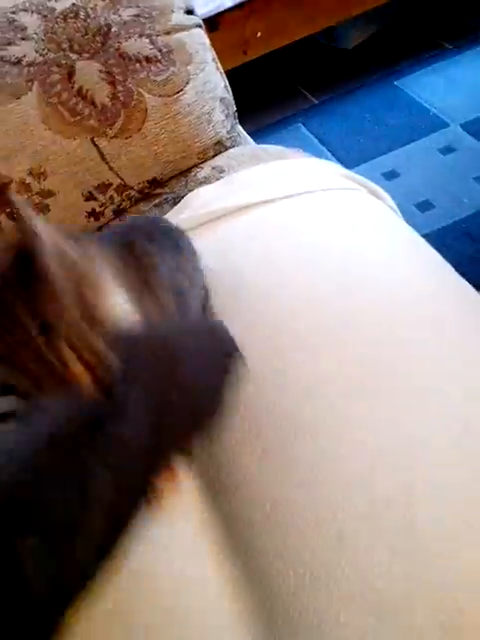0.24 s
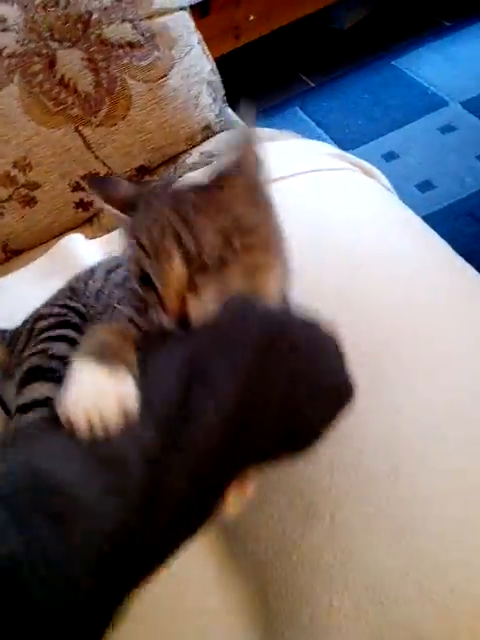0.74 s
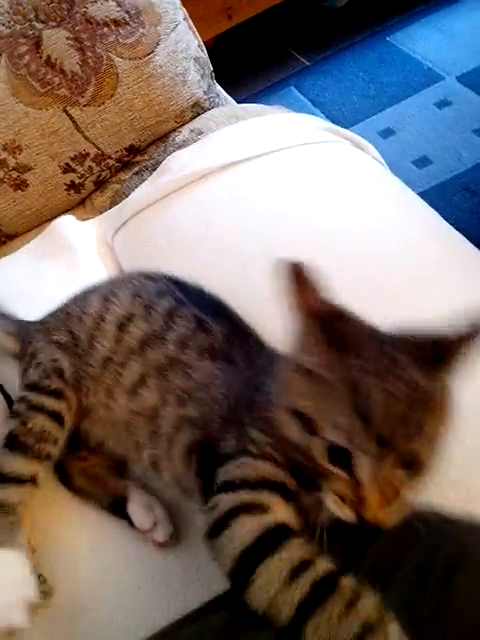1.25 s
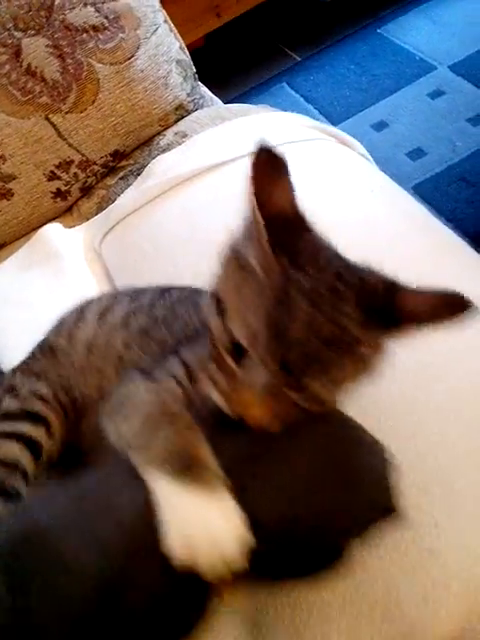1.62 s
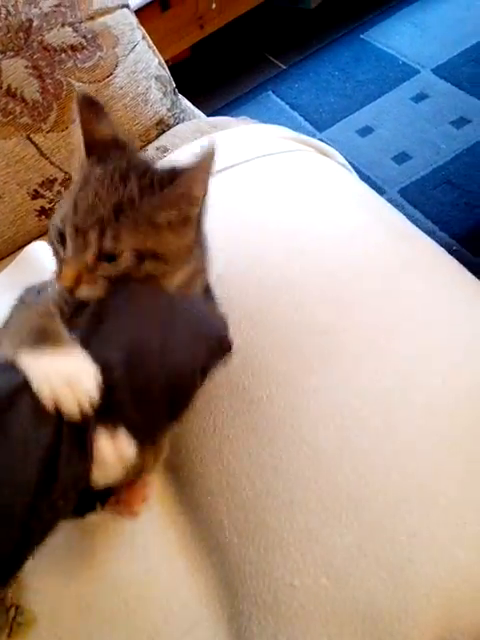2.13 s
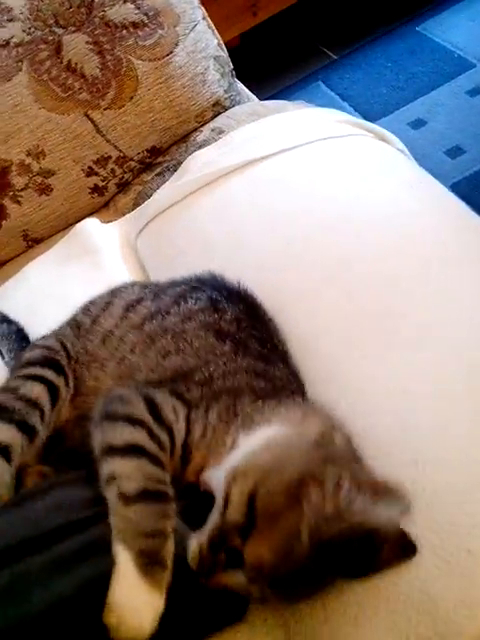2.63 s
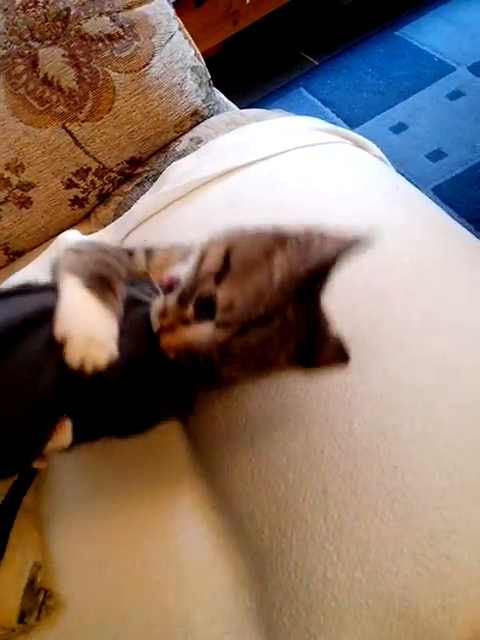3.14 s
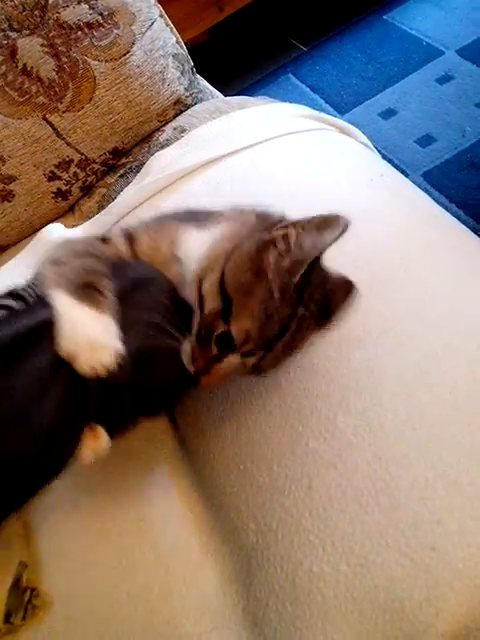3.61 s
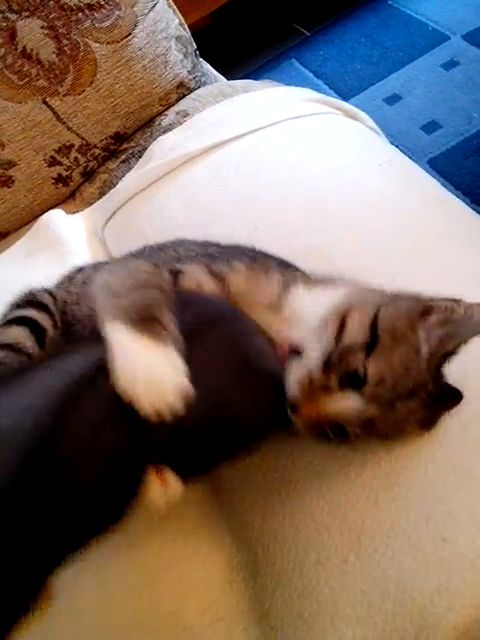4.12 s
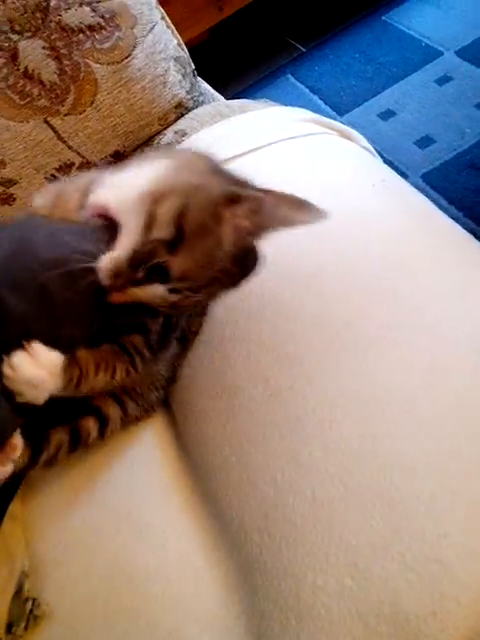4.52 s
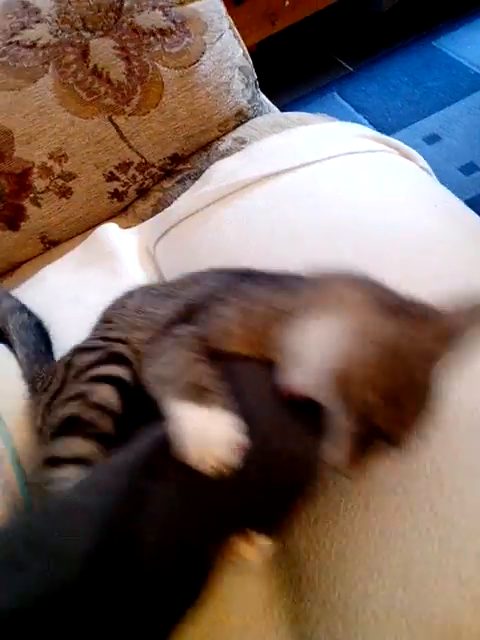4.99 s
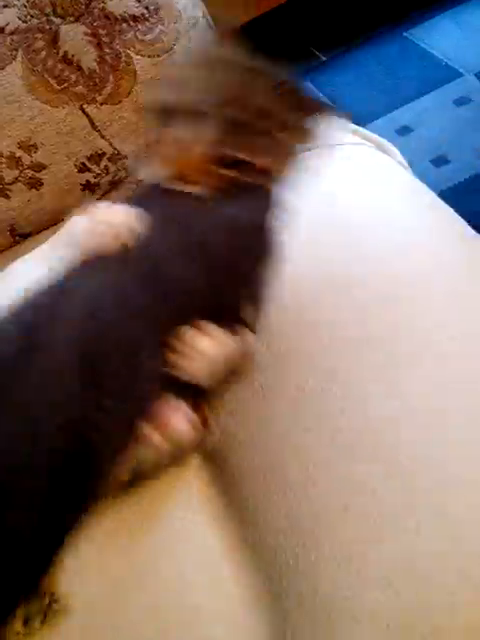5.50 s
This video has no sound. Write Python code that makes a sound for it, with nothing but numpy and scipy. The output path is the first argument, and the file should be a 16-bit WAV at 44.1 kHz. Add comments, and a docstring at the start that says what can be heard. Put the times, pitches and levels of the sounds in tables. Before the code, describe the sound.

A small, quiet furnished room, heard through one close, modest microphone with thin bass and no extreme treble. Soft air noise, hiss and very faint cloth rustling run throughout. At 0.15 s a bright cloth snap comes with a padded paw bump and tiny scrape. From 0.5 to 1.5 s short scuffs, fabric rubs and dull thumps cluster irregularly, with lighter ticks near 0.8 and 1.0 s and a firmer bump at 1.5 s. At 2.0 s a strong snap with a knock rings out, another at 2.2 s, then a duller thump and scrape at 2.6 s. Around 3.1 to 3.2 s quick ticks accompany a heavy soft thud; crisp clicks follow until 3.5 s. After a lull, a flurry of small clicks runs from 4.4 to 4.7 s. Faint rubbing leads to a last sharp snap at 5.7 s. Each snap gets a brief hard-surface echo and short room tail.

```python
"""A kitten wrestles with a sleeved arm on a sofa in a small, quiet room; air, hiss and faint cloth rustle run throughout.
It opens with a snap, a paw bump and a scrape; scuffs and soft bumps follow until about 1.5 s.
From 2 to 3.5 s claws and teeth snap free again and again; a denser flurry comes at 4.4 to 4.7 s.
Faint rubbing leads to a last snap at 5.72 s. Snaps and thuds are damped pulses, rubs are clumpy shaped noise;
two hard surfaces echo each snap and the room rings briefly."""
import sys
import numpy as np
from scipy import signal
from scipy.fft import rfft, irfft, next_fast_len
from scipy.io import wavfile
from scipy.ndimage import map_coordinates

SR = 44100
rng = np.random.default_rng(int(sys.argv[2]) if len(sys.argv) > 2 else 0)


def put_to_file(sound):
    """Save the sound as 16-bit audio at rate SR, in the file named by the first command-line argument."""
    columns = np.atleast_2d(sound).T  # one column per channel
    safe = np.clip(columns, -1, 1)
    whole_steps = np.round(safe * 32767)
    wavfile.write(sys.argv[1], SR, whole_steps.astype(np.int16))


N = 253575  # samples in the scene
SIZE, LEAD = 2048, 256  # samples in one pulse, and of those before its onset


def amp(db):
    """Decibels to gain."""
    return 10 ** (np.asarray(db) / 20)


def unit(x):
    """x at rms 1."""
    return x / np.sqrt(np.mean(x ** 2) + 1e-20)


def along(points, hz):
    """Read (frequency, value) points on a log frequency axis."""
    f, v = np.transpose(points)
    return np.interp(np.log(hz + 1e-6), np.log(f), v)


def add(track, s, x):
    """Mix x into the track from time s."""
    i = max(round(s * SR), 0)
    track[i:i + len(x)] += x[:max(len(track) - i, 0)]


def wobble(rate, n):
    """A smooth random curve of n samples, rate knots a second."""
    knots = rng.standard_normal(int(n * rate / SR) + 4)
    return map_coordinates(knots, [np.arange(n) * rate / SR])


def filtered(x, gain_at):
    """x times a gain that depends on frequency."""
    m = next_fast_len(x.shape[-1] + 8192)
    spectrum = rfft(x, m) * gain_at(np.fft.rfftfreq(m, 1 / SR))
    return irfft(spectrum, m)[..., :x.shape[-1]]


def coloured(x, shape, pitch_hz=1):
    """x through a spectrum shape, at rms 1."""
    return unit(filtered(x, lambda hz: amp(along(shape, hz / pitch_hz))))


def fibres(n, rate, clump_db):
    """Threads slipping: noise that comes in small clumps."""
    return rng.standard_normal(n) * amp(clump_db * wobble(rate, n))


def pulse(shape, pitch_hz, ripple_db, abrupt, narrowness=1):
    """One push through a damped body, rms 1 over 10 ms; abrupt 1 starts at once, 0 swells as it fades."""
    ratio = np.fft.rfftfreq(SIZE, 1 / SR) / pitch_hz
    # random ripple makes every body slightly different
    ripple = map_coordinates(rng.standard_normal(size=64), [8 * np.log1p(ratio)], mode="nearest")
    colour_db = narrowness * along(shape, ratio) + ripple_db * ripple
    # moving the cepstrum to positive times moves the energy after the onset
    cepstrum = irfft(np.log(amp(colour_db)))
    cepstrum[1:SIZE // 2] *= 1 + min(abrupt, 1)
    cepstrum[SIZE // 2 + 1:] *= 1 - min(abrupt, 1)
    ring = np.roll(irfft(np.exp(rfft(cepstrum))), LEAD)
    return ring * np.sqrt(SR / 100) / np.linalg.norm(ring)


# how long the room rings: (frequency [Hz], time to fall 60 dB [s])
ROOM_DECAY = [(150, 0.31), (500, 0.27), (2000, 0.23), (4500, 0.32), (8000, 0.14)]


def room_tail():
    """Scattered reflections: a strong start, a dip, a rebuild by 12 ms, each band dying at its own speed; energy 1."""
    hz, t, z = signal.stft(rng.standard_normal(SR // 3), SR, nperseg=256)
    decay = amp(-60 * t / along(ROOM_DECAY, hz)[:, None])
    tail = signal.istft(z * decay, SR, nperseg=256)[1]
    t = np.arange(len(tail)) / SR
    build = np.interp(t, [0, .008, .012], [.33, .5, 1])
    early = 1 + 4.2 * np.exp(-t / 0.0045)
    tail *= build * early
    return tail / np.linalg.norm(tail)


def echo(delay_s, spread_s):
    """A near hard surface answers with a slightly smeared copy; energy 1."""
    t = np.arange(SIZE // 8) / SR
    smear = .2 * rng.standard_normal(len(t)) * np.exp(-t / spread_s)
    smear[0] = 1
    return np.pad(smear / np.linalg.norm(smear), (round(delay_s * SR), 0))


# colour of the room's air and the microphone hiss: (frequency [Hz], level [dB])
AIR_COLOUR = [(20, -37), (45, -12), (75, -6.5), (105, -5), (150, 0.5), (250, -3), (400, -5), (800, -10.5),
              (1700, -13.5), (3000, -17), (5000, -15.5), (6800, -15.5), (8000, -28.5), (9000, -48)]
# colour of shifting padding: (multiple of its pitch [ratio], level [dB])
BODY_SHAPE = [(.1, -25), (.35, -4), (.65, -9), (1, 1.5), (1.4, -8), (2.3, -11.5), (5, -18), (14, -58.5)]
# colour of taut cloth, for rustles and clacks: (multiple of its pitch [ratio], level [dB])
CLACK_SHAPE = [(.25, -24.5), (.5, -8.5), (0.748, -0.5), (1.002, 5), (1.222, 3), (1.45, -25), (2.199, -27),
               (6, -57)]
AIR_DB = -52.5
FIDGET_DB, FIDGET_RATE, FIDGET_SWING_DB = -74.5, 9.7, 2.5  # moving sleeve: level, knots a second, depth


def background():
    """Room air and microphone hiss as shaped noise, with faint constant shifting and rustling of cloth."""
    air = amp(AIR_DB) * coloured(rng.standard_normal(N), AIR_COLOUR)
    shifting = amp(-65.0) * coloured(fibres(N, rate=36, clump_db=6.5), BODY_SHAPE, 295)
    fidget = fibres(N, rate=FIDGET_RATE, clump_db=FIDGET_SWING_DB)
    rustle = amp(FIDGET_DB) * coloured(fidget, CLACK_SHAPE, 1400)
    return air + shifting + rustle


STROKE_SKEW, STROKE_ROUND = 0.58, 0.61  # a rub swells faster than it fades (skew under 1)


def stroke(length_s):
    """The swell and fade of one rub, rms 1."""
    n = max(round(length_s * SR), SIZE // 8)
    arch = np.sin(np.pi * (np.arange(n) / n) ** STROKE_SKEW)
    return unit(np.abs(arch) ** STROKE_ROUND)


# hiss of the weave: (frequency [Hz], level [dB])
WEAVE_HISS = [(1500, -25), (2400, -10), (3300, -3), (4500, 0), (5500, -4), (6800, -8), (8000, -25),
              (9000, -45)]
RUSTLE_DB, HISS_DB = -5.5, -1.5  # the sleeve and the weave, against the surface level


def rub(length_s, body_db, body_hz, surface_db):
    """Rubbing shakes the padding, rustles the sleeve and hisses in the weave."""
    swell = stroke(length_s)
    n = len(swell)
    body = amp(body_db) * coloured(fibres(n, rate=147.8, clump_db=5), BODY_SHAPE, body_hz)
    rustle = amp(RUSTLE_DB) * coloured(fibres(n, rate=380, clump_db=2.5), CLACK_SHAPE, 1720)
    hiss = amp(HISS_DB) * coloured(fibres(n, rate=440, clump_db=3.5), WEAVE_HISS)
    return swell * (body + amp(surface_db) * (rustle + hiss))


# cloth rubbing: (start [s], length [s], body level [dB], body pitch [Hz], surface level [dB])
SCUFFS = [(0.523, 0.087, -50, 150, -64), (.595, 0.1, -42.5, 187, -57.5), (.715, 0.069, -46.5, 266, -58.5),
          (.775, 0.06, -44, 316, -53.5), (.985, 0.092, -47, 344, -56.5), (1.072, 0.056, -47, 170, -56),
          (1.307, 0.093, -54.5, 368, -62), (1.406, 0.12, -47, 245, -59), (1.54, .06, -52.5, 320, -62),
          (2.035, 0.065, -48, 600, -66), (2.63, 0.17, -51, 320, -57.5), (3.1, 0.16, -48.5, 220, -68),
          (4.38, .07, -49.5, 396, -56), (4.696, .07, -54, 200, -58), (5.439, 0.18, -57, 310, -69)]


def scuffs():
    """Fur and sleeve rub over the sofa as the two shift their grip."""
    out = np.zeros(N)
    for start, length_s, body_db, body_hz, surface_db in SCUFFS:
        add(out, start, rub(length_s, body_db, body_hz, surface_db))
    return out


# a claw or paw dragged over the weave: (start [s], length [s], level [dB], pitch [Hz])
SCRAPES = [(0.159, 0.043, -53, 2190), (0.249, .05, -64, 2870), (0.645, .055, -49, 534),
           (0.736, 0.11, -53, 4820), (0.986, .06, -46.5, 4850), (1.087, .055, -50, 1300),
           (1.438, .11, -53, 3660), (2.213, .06, -50.5, 1480), (2.304, .05, -59, 1730),
           (2.63, 0.093, -43, 482), (4.7, .07, -52.5, 4600), (5.115, .08, -65, 1640)]
# narrow colour of a scrape: (multiple of its pitch [ratio], level [dB])
SCRAPE_SHAPE = [(.55, -48), (.75, -12), (.9, -5), (1.08, -0.5), (1.25, -31.5), (1.6, -29.5)]


def scrapes():
    """Crossing threads at a steady speed sings in a narrow band."""
    out = np.zeros(N)
    for start, length_s, db, hz in SCRAPES:
        swell = stroke(length_s)
        threads = fibres(len(swell), rate=300, clump_db=4)
        add(out, start, amp(db) * swell * coloured(threads, SCRAPE_SHAPE, hz))
    return out


# soft blows on the cushion: (time [s], level [dB], pitch [Hz])
BUMPS = [(0.154, -44, 197), (.213, -40, 246), (0.2207, -30.5, 198), (0.6265, -40, 260), (0.6339, -41, 159),
         (0.7536, -37.5, 316), (1.0766, -39, 195), (1.4467, -43, 197), (1.4953, -29, 241),
         (2.094, -39, 134), (2.6085, -30.5, 207), (3.1041, -35.5, 196), (3.1649, -25.5, 214),
         (4.6954, -40.5, 148)]
# colour of a blow: (multiple of its pitch [ratio], level [dB])
BUMP_SHAPE = [(.1, -18), (.35, -18.5), (.65, -3.5), (1, -2.5), (1.6, -9), (2.6, -26.5), (6, -49),
              (20, -81.5)]


def bumps():
    """Paws and body land on the cushion: a damped low pulse, with a little room behind it."""
    out = np.zeros(N)
    for s, db, hz in BUMPS:
        start = s - LEAD / SR
        thud = amp(db) * pulse(BUMP_SHAPE, hz, ripple_db=1.5, abrupt=0.7)
        add(out, start, thud)
        add(out, start, amp(-11) * signal.fftconvolve(thud, room_tail()))
    return out


# cloth snapping free: (time [s], tick level [dB], tick pitch [Hz], clack level [dB], clack pitch [Hz],
# knock level [dB], room against tick [dB])
SNAPS = [(0.1514, -32, 4680, -33.5, 670, -29.5, -4), (0.2222, -53, 3070, -52.5, 1010, -50.5, 2.5),
         (0.7877, -37.5, 4330, -71, 960, -46, -4.5), (0.9818, -43, 4240, -48.5, 1220, -54, -5),
         (1.914, -56, 3420, -63, 1700, -54, -2), (2.0281, -30, 4530, -27.5, 1604, -22.5, -10.5),
         (2.2081, -33, 4260, -34.5, 1460, -32, -11), (2.6015, -46.5, 4160, -37, 1130, -27, 12),
         (3.099, -37.5, 4960, -36.5, 555, -37, -5.5), (3.1597, -39.5, 4950, -35.5, 910, -40.5, -8),
         (3.2204, -26.5, 4240, -56, 970, -50, -15.5), (3.3634, -40, 4000, -53.5, 1780, -60, -7.5),
         (3.4599, -29, 4100, -41.5, 1330, -49.5, -15), (4.3747, -33.5, 4220, -45.5, 1230, -39.5, -13),
         (4.4176, -38.5, 4180, -52, 1480, -40, -9.5), (4.4739, -48.5, 3930, -65, 1410, -47, -7.5),
         (4.5484, -41.5, 4150, -55, 1200, -48.5, -6), (4.691, -48.5, 4020, -46.5, 1430, -43, 0.5),
         (5.72, -30, 4270, -46, 1260, -35.5, -0.5)]
# colour of the thread's tick: (multiple of its pitch [ratio], level [dB])
TICK_SHAPE = [(.42, -17.5), (.57, -30), (.72, -4), (.88, 3.5), (1, 8.5), (1.14, 5.5), (1.45, -6.5),
              (1.8, -37), (2.2, -46)]
# colour of the knock underneath: (multiple of its pitch [ratio], level [dB])
KNOCK_SHAPE = [(.1, -12), (.3, -8), (.6, -0.5), (1, 4), (1.4, -6.5), (2, -16.5), (4, -18), (9, -94)]
# near hard surfaces: (delay [s], level [dB], smear [s])
WALLS = [(0.0108, -3, 0.00049), (0.0156, -6, 0.0012)]
# a tauter thread ticks higher and narrower: narrowness 1 at SLACK_HZ, rising as this power of the pitch
SLACK_HZ, TAUT_POWER = 4110, 4.5
KNOCK_HZ = 476  # the arm under the cloth
# a very near surface returns the tick inverted, which colours it with peaks and dips
NEAR_DELAY_S, NEAR_DB = .000755, -14
# before a snap the padding gives a brief low swell, its level set against the knock
SWELL_S, SWELL_HZ, SWELL_BODY_DB, SWELL_TREBLE_DB = 0.011, 380, -15.5, -28.5
# bodies screen the microphone, so the room stands out; low parts bend round them and feel only this share
SCREEN_SHARE = 0.51
CLACK_ROOM_DB, KNOCK_ROOM_DB = -6.5, -11  # what the room gets of the low parts
TAIL_DB = -0.5  # the scattered reflections
# the freed cloth slides on briefly, as hard as the snap that is thrown into the room
SLIDE_DELAY_S, SLIDE_S, SLIDE_HZ, SLIDE_BODY_DB, SLIDE_SURFACE_DB = .01, 0.051, 296, -13.5, -12


def snaps():
    """A release is a bright tick, a clack of taut cloth and a knock of what lies under; then the cloth slides."""
    out = np.zeros(N)
    for s, tick_db, tick_hz, clack_db, clack_hz, knock_db, room_db in SNAPS:
        start = s - LEAD / SR
        narrowness = max((tick_hz / SLACK_HZ) ** TAUT_POWER, .8)
        tick = amp(tick_db) * pulse(TICK_SHAPE, tick_hz, ripple_db=4.0, abrupt=0.64, narrowness=narrowness)
        clack = amp(clack_db) * pulse(CLACK_SHAPE, clack_hz, ripple_db=3.5, abrupt=0.36)
        knock = amp(knock_db) * pulse(KNOCK_SHAPE, KNOCK_HZ, ripple_db=1.2, abrupt=0.43)

        # reversed, the swell grows slowly towards the snap
        swell = rub(SWELL_S, knock_db + SWELL_BODY_DB, SWELL_HZ, tick_db + SWELL_TREBLE_DB)[::-1]
        add(out, s - SWELL_S, swell)

        # the tick and its near reflection; the heavier parts start just after the tick
        add(out, start, amp(0.05) * tick)
        add(out, start + NEAR_DELAY_S, -amp(NEAR_DB) * tick)
        add(out, start + 0.00022, clack)
        add(out, start + 0.00058, -knock)

        # the upholstery soaks up the low parts; the tick spreads into the room with a broader colour
        thrown_db = tick_db + room_db
        broad_tick = pulse(TICK_SHAPE, tick_hz, ripple_db=1, abrupt=0.89, narrowness=0.41 * narrowness)
        low_parts = amp(CLACK_ROOM_DB) * clack + amp(KNOCK_ROOM_DB) * knock
        thrown = amp(thrown_db) * broad_tick + amp(SCREEN_SHARE * room_db) * low_parts
        for delay_s, wall_db, smear_s in WALLS:
            add(out, start, amp(wall_db) * signal.fftconvolve(thrown, echo(delay_s, smear_s)))
        add(out, start, amp(TAIL_DB) * signal.fftconvolve(thrown, room_tail()))

        slide = rub(SLIDE_S, thrown_db + SLIDE_BODY_DB, SLIDE_HZ, thrown_db + SLIDE_SURFACE_DB)
        add(out, s + SLIDE_DELAY_S, slide)
    return out


# the microphone's response to close sounds: (frequency [Hz], level [dB])
PRESENCE = [(1500, -1), (1950, 1.5), (2350, 4.5), (2750, 3), (3250, 3), (3750, -0.5), (4600, -0.5),
            (5600, -0.5), (6500, 0.5), (7400, -1), (9000, -34)]


def scene():
    """All the play happens close to one microphone, over the steady background."""
    rubbing = scuffs() + scrapes()
    rubbing = rubbing + amp(-7.5) * signal.fftconvolve(rubbing, room_tail())[:N]
    play = filtered(snaps() + bumps() + rubbing, lambda hz: amp(along(PRESENCE, hz)))
    return (play + background())[None]


TOP_HZ = 8900  # the recorder's band limit


def record(dry):
    """The small microphone thins the deep bass, and the recorder cuts steeply above its band limit."""
    bass = [(25, -6.5), (70, -11.5), (115, -0.5)]  # (frequency [Hz], level [dB])
    thin = filtered(dry, lambda hz: amp(along(bass, hz)))
    return filtered(thin, lambda hz: 1 / np.sqrt(1 + (hz / TOP_HZ) ** 120))


dry = scene()
out = record(dry)
put_to_file(out)
```